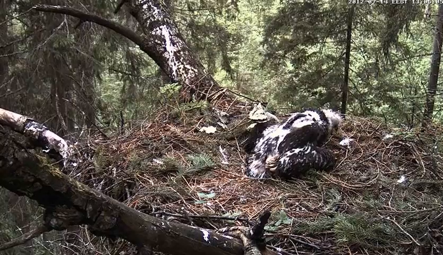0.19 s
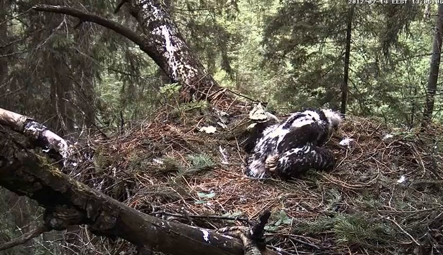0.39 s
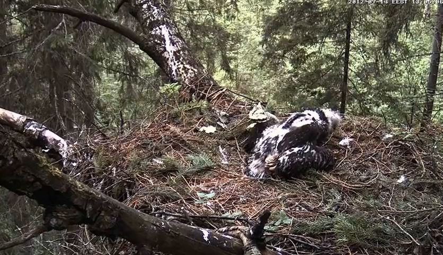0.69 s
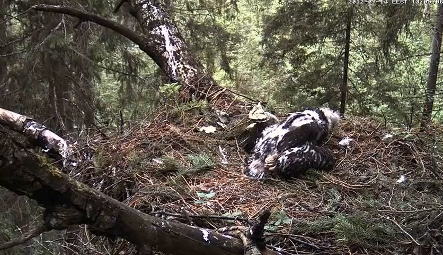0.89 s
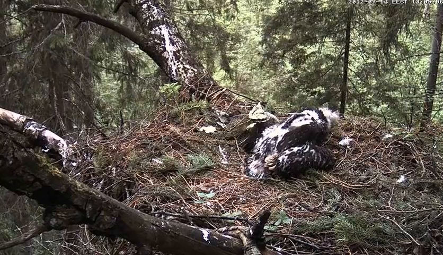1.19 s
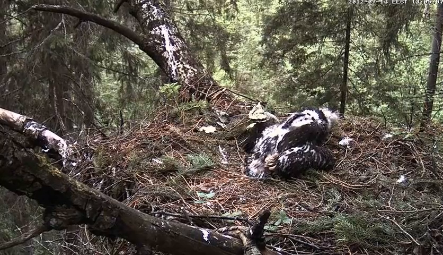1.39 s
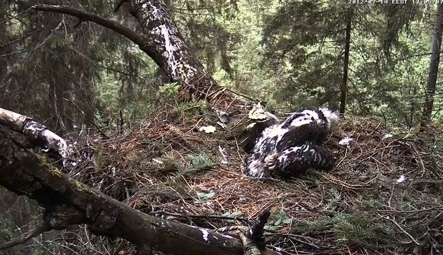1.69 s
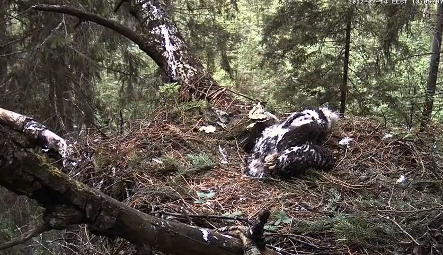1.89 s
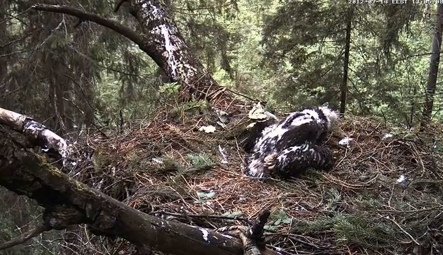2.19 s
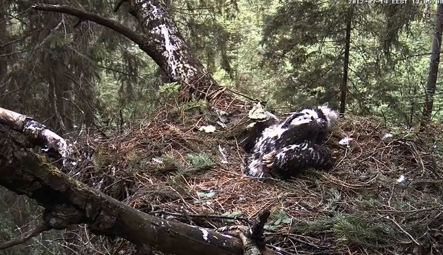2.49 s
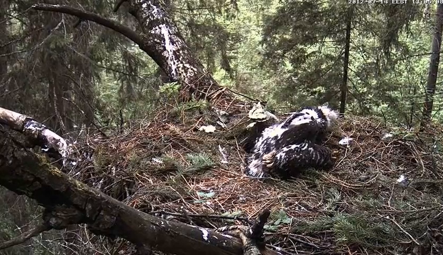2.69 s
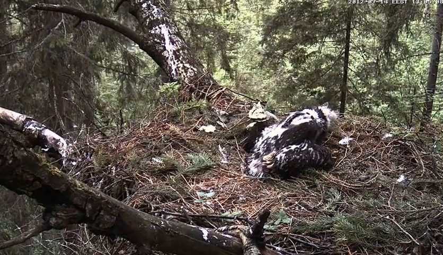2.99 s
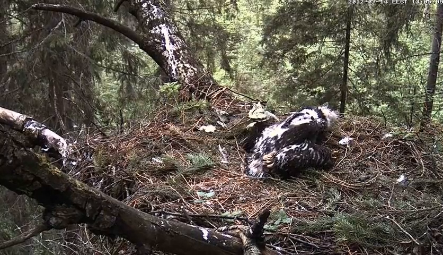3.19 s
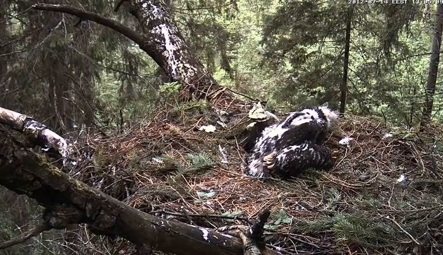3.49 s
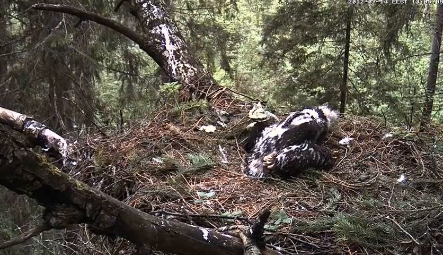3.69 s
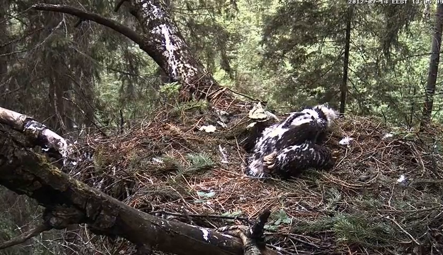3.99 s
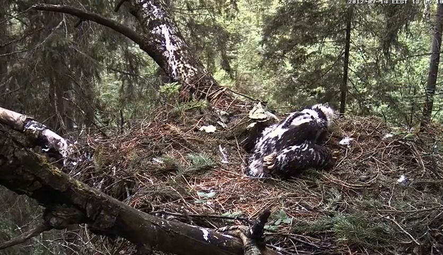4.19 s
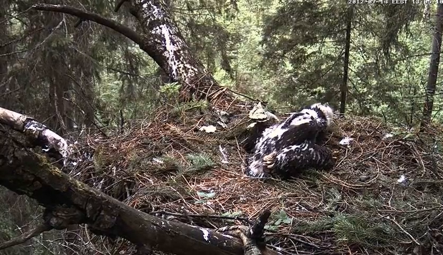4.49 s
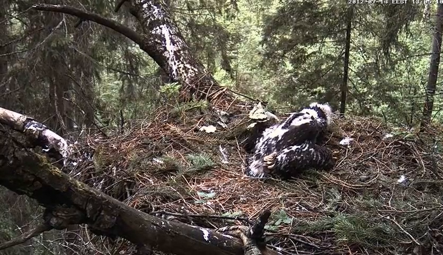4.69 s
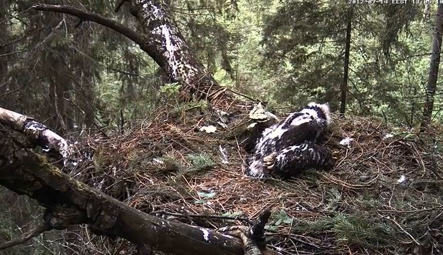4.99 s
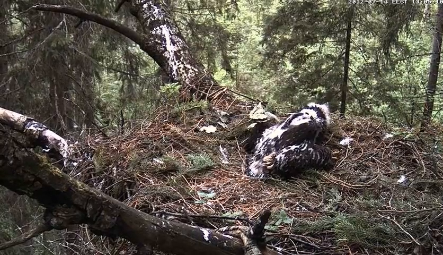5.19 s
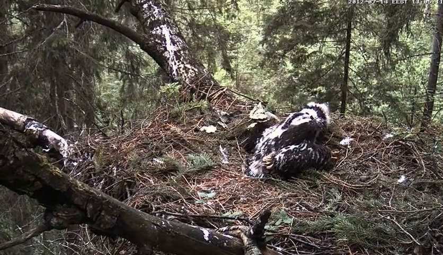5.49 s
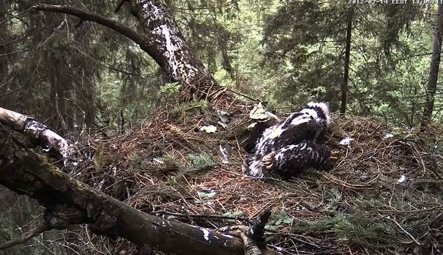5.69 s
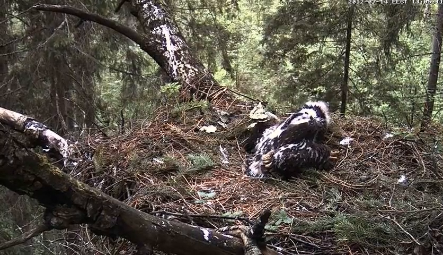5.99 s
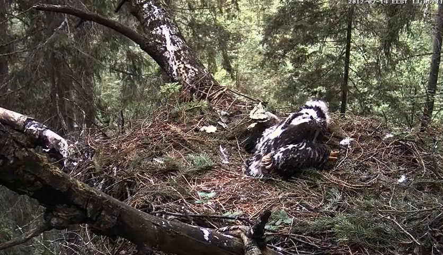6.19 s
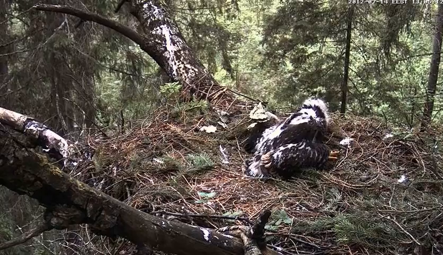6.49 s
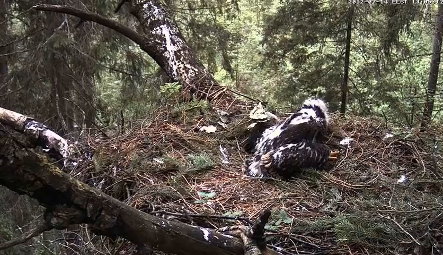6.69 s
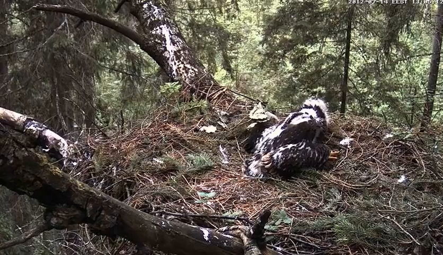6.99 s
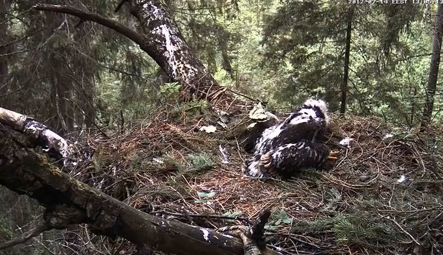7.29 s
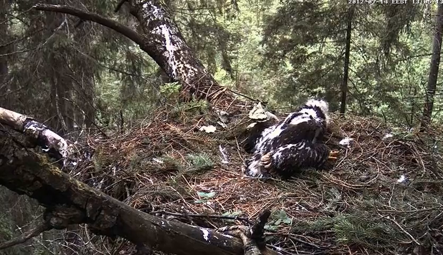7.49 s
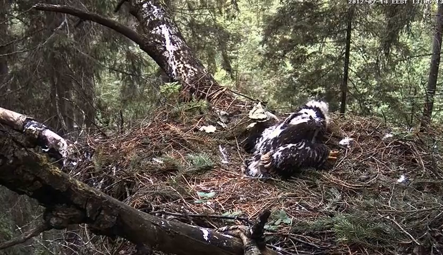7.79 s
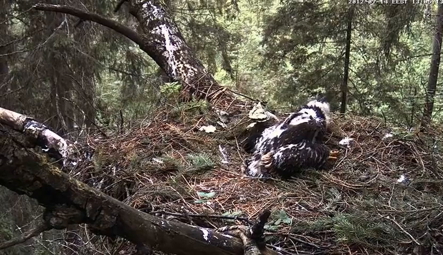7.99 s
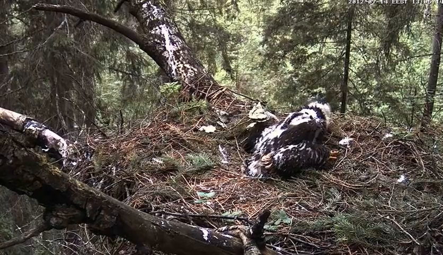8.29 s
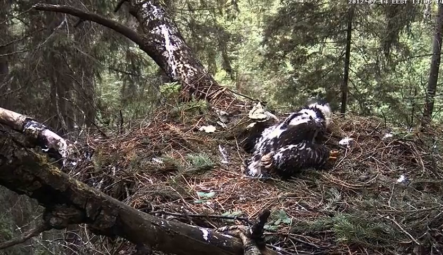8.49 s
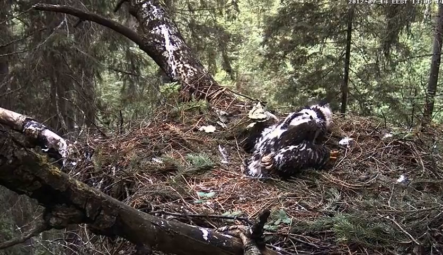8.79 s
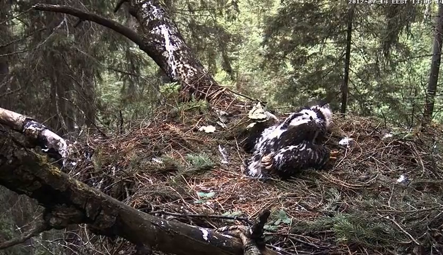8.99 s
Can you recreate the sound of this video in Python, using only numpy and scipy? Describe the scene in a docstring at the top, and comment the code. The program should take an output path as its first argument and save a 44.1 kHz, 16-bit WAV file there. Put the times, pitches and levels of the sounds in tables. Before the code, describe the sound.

An eagle chick calls from its forest nest, giving short, high whistles about three times every two seconds. Each one slides down and breaks to a lower note, some with a raspy edge, and leaves a faint echo. Soft wind hisses steadily in the treetops, with tiny twig scrapes and a few very faint, distant chirps. The close microphone sounds thin and distorts slightly on the calls.

```python
"""Eagle chick begging in a forest

A chick calls on its nest, close to a small microphone that overloads on the calls.
Each call is a falling whistle, made by vibrating membranes in its voice box (the syrinx): it turns
raspy, then breaks down to a lower note, and the trees echo it faintly. Behind it, air rushes
through the treetops, small birds chirp far off and twigs shift in the nest."""
import sys
import numpy as np
from scipy import signal
from scipy.fft import rfft, irfft, next_fast_len
from scipy.io import wavfile
from scipy.ndimage import uniform_filter1d

SR = 44100
rng = np.random.default_rng(int(sys.argv[2]) if len(sys.argv) > 2 else 0)


def wrap_up_sound(samples):
    """Save the sound to the file named by the first command line argument, as 16-bit audio."""
    columns = np.atleast_2d(samples).T
    # keep every value between -1 and 1, then stretch to whole-number steps
    tamed = np.clip(columns, -1, 1)
    steps = np.round(tamed * 32767).astype(np.int16)
    wavfile.write(sys.argv[1], SR, steps)


N = 401310
TIME = np.arange(N) / SR

# The chick's calls: start/s, upper note length/s, lower note length/s, first pitch/Hz,
# pitch at the break/Hz, last pitch/Hz, base level/dB, swell time/s, rasp (0-1), break width/s
CALLS = [(0.459, .058, 0.047, 2744, 2616, 1917, -25, 0.0091, 0.4, 0.0023),
         (1.102, 0.064, 0.05, 2810, 2582, 1964, -23.0, 0.025, 0.51, 0.0029),
         (1.749, 0.062, .050, 3004, 2476, 1959, -22.8, 0.031, 0.77, .002),
         (2.394, 0.064, 0.049, 2680, 2600, 2005, -23.5, 0.014, 0.67, 0.0012),
         (3.129, 0.079, 0.049, 2872, 2587, 1945, -24.5, 0.04, 0.55, .002),
         (3.791, .062, 0.039, 2750, 2555, 1970, -23, .005, 0.64, 0.0019),
         (4.431, 0.066, 0.054, 2752, 2580, 1953, -24.5, 0.016, 0.42, 0.0025),
         (5.092, .059, .065, 3169, 2736, 1972, -27.5, 0.017, 0.15, 0.026),
         (5.798, 0.059, 0.059, 3187, 2690, 1975, -26, .018, 0.2, 0.018),
         (6.477, 0.067, .048, 2805, 2544, 1946, -25.5, 0.014, 0.25, 0.0026),
         (7.128, 0.068, .049, 2910, 2510, 1937, -25, 0.019, 0.3, 0.0029),
         (7.809, .083, 0.039, 2840, 2473, 1862, -26.5, 0.026, 0.2, 0.001),
         (8.446, 0.072, .057, 3026, 2642, 1941, -27.5, 0.03, .21, 0.0023),
         (9.094, 0.07, 0.065, 2800, 2505, 1950, -19, 0.007, 0.15, .002)]


def from_db(db):
    """Turn decibels into a factor to multiply by."""
    return 10 ** (np.asarray(db) / 20)


def unit_power(x):
    """Scale a signal so that its average power is 1."""
    return x / np.sqrt(np.mean(np.abs(x) ** 2) + 1e-20)


def colour(x, spectrum):
    """Make some frequencies louder and others softer, along a curve of f/Hz, gain/dB."""
    hz, db = np.transpose(spectrum)
    size = next_fast_len(N + SR)
    bins_hz = np.maximum(np.fft.rfftfreq(size, 1 / SR), 1)
    gain = from_db(np.interp(np.log(bins_hz), np.log(hz), db))
    return irfft(rfft(x, size) * gain, size)[:N]


def noise(spectrum):
    """Noise of power 1, shaped by a curve of f/Hz, relative level/dB."""
    return unit_power(colour(rng.standard_normal(N), spectrum))


def flutter(rate_hz):
    """A random wobble of typical size 1, up to about the given rate."""
    smoothing = signal.butter(2, rate_hz, fs=SR, output="sos")
    return unit_power(signal.sosfilt(smoothing, rng.standard_normal(N)))


def low_pass(x, edge_hz):
    """Cut away the frequencies above the edge."""
    return signal.sosfilt(signal.ellip(10, 0.1, 90, edge_hz, fs=SR, output="sos"), x)


def bump(centre_s, width_s):
    """A smooth rise and fall in time, 1 at its peak."""
    return np.exp(-np.minimum(((TIME - centre_s) / width_s) ** 2, 100))


def forest_rush(roar_db=-0.45, hiss_db=-3.0, wander_db=0.8, wander_hz=3):
    """Air in the treetops makes a low roar and a lighter hiss, both following the breeze."""
    # Strength of the breeze: t/s, level/dB
    breeze = [(0.0, -48), (1.71, -49), (1.84, -50.5), (2.72, -50.5), (3.02, -50), (6.35, -48.5),
              (6.63, -51.5), (9.05, -50.5)]
    # Tone colours of the roar and the hiss: f/Hz, relative level/dB
    roar = [(100, -68.5), (140, -43.5), (190, -28), (240, -13.5), (320, -4.5), (430, 1), (560, -0.5),
            (700, -6.5), (900, -22), (1400, -32), (2500, -66)]
    hiss = [(120, -66.5), (400, -37), (800, -3), (1250, -2), (1500, 2.5), (1650, -0.5), (1900, 2.5),
            (2400, -5.5), (2750, -5), (3400, -8.5), (3900, -21)]
    breeze_db = np.interp(TIME, *np.transpose(breeze)) + wander_db * flutter(wander_hz)
    return from_db(breeze_db) * (from_db(roar_db) * noise(roar) + from_db(hiss_db) * noise(hiss))


def far_birds(rise_hz_per_s=3340, waver_hz=35):
    """Small birds far off give faint, rising whistles."""
    # One row per chirp: start/s, length/s, first pitch/Hz, level/dB
    chirps = [(0.273, 0.022, 3560, -61), (3.568, 0.063, 3330, -57.5), (4.225, 0.063, 3200, -57),
              (8.896, 0.044, 3480, -65)]
    birds = np.zeros(N)
    waver = waver_hz * flutter(80)
    for start, length, first_hz, db in chirps:
        span = (TIME >= start) & (TIME < start + length)
        t = TIME[span] - start
        pitch = first_hz + rise_hz_per_s * t + waver[span]
        loudness = from_db(db) * np.sin(np.pi * t / length)
        birds[span] += np.sqrt(2) * loudness * np.sin(2 * np.pi * np.cumsum(pitch) / SR)
    return birds


def beak_air(lead_s=0.013, width_s=0.015, onset_db=-53, break_db=-37):
    """Air hisses through the open beak just before each call and as the voice breaks."""
    # Tone colours of the air at those two moments: f/Hz, relative level/dB
    onset_hiss = [(1500, -22), (2200, 4.5), (2800, 10), (3400, -8), (4000, -29.5)]
    break_hiss = [(600, -30.5), (1200, -8.5), (2000, -14), (2400, 1.5), (2900, 6), (3500, -14),
                  (4000, -23.5)]
    before = sum(bump(start - lead_s, width_s) for start, *_ in CALLS)
    breaks = sum(bump(start + upper_s + gap_s / 2, gap_s) for start, upper_s, *_, gap_s in CALLS)
    return from_db(onset_db) * before * noise(onset_hiss) + from_db(break_db) * breaks * noise(break_hiss)


def opening_squeak(arrival_hz=3250, fall_hz_per_s=14000, waver_hz=170, db=-48, lead_s=0.026, fade_s=0.0042):
    """A thin, unsteady squeak swells and slides down into each call."""
    starts = np.array([start for start, *_ in CALLS])
    nearest_call = np.abs(TIME[:, None] - starts).argmin(axis=1)
    time_left = starts[nearest_call] - TIME
    pitch = arrival_hz + fall_hz_per_s * time_left + waver_hz * flutter(600)
    loudness = from_db(db) * np.interp(time_left, [-fade_s, 0, lead_s], [0, 1, 0])
    return np.sqrt(2) * loudness * np.sin(2 * np.pi * np.cumsum(pitch) / SR)


def voice_box():
    """Pitch, loudness and rasp of the calls: a roughening upper note, a sudden break, a lower note."""
    scoop_hz, scoop_s, fall_hz_per_s = 339, 0.0055, 6800
    attack_s, release_s, start_share = 0.0059, 0.014, 0.37
    rough_below_hz, roughen_s, late_rasp, break_rasp = 2816, 0.012, 0.075, 0.22
    upper_boost_db, rasp_loss_db, thin_loss_db = 5, 14.5, 2
    squeeze_s, break_depth = 0.002, 0.76
    shake_db, shake_hz = 1.5, 70
    pitch, loudness, rasp = np.zeros((3, N))
    for start, upper_s, lower_s, first_hz, break_hz, last_hz, db, swell_s, full_rasp, gap_s in CALLS:
        length = upper_s + lower_s
        span = (TIME >= start) & (TIME < start + length)
        t = TIME[span] - start
        time_left = length - t
        upper = t < upper_s
        upper_pitch = first_hz + (break_hz - first_hz) * t / upper_s
        lower_pitch = last_hz + fall_hz_per_s * time_left
        scoop = scoop_hz * np.exp(-t / scoop_s)  # a quick slide in from above
        pitch[span] = np.where(upper, upper_pitch, lower_pitch) + scoop
        # high up the voice is thin and clean; as it sinks it turns louder and rough
        thin = 0.5 + 0.5 * np.tanh((pitch[span] - rough_below_hz) / 15)
        effort = np.minimum(t / swell_s, 1) ** 4.1
        fades = np.minimum(t / attack_s, 1) * np.minimum(time_left / release_s, 1)
        envelope = fades * (start_share + (1 - start_share) * effort)
        # the membranes nearly stop while they switch to the lower note
        stall = np.exp(-((t - upper_s) / np.where(upper, squeeze_s, gap_s)) ** 4)
        note_db = db + upper * (upper_boost_db - rasp_loss_db * full_rasp) - thin_loss_db * thin
        loudness[span] = from_db(note_db) * envelope * (1 - break_depth * stall)
        roughening = full_rasp * (1 - thin) * effort * np.minimum(t / roughen_s, 1)
        settling = late_rasp * time_left / lower_s + break_rasp * stall
        rasp[span] = np.where(upper, roughening, settling)
    shake = from_db(shake_db * rasp * flutter(shake_hz))
    return pitch, loudness * shake, rasp


def chick(voice_db=-0.02, jitter=0.0056, jitter_hz=400, beat_hz=400, beat_spread_hz=100,
          lower_share=0.6, rasp_db=-10.0, air_db=-31):
    """A nearly pure whistle; when it rasps, a lower tone joins in and beats against it."""
    # Tone colour of the rushing breath: f/Hz, relative level/dB
    breath_colour = [(400, -35), (800, -25), (1100, -5), (1700, -3), (2300, 3), (2900, 5), (3600, -14.5),
                     (4000, -28)]
    # the membranes need about two milliseconds to follow any change
    pitch, loudness, rasp = uniform_filter1d(np.array(voice_box()), size=90, axis=1)
    phase = 2 * np.pi * np.cumsum(pitch * (1 + jitter * flutter(jitter_hz))) / SR
    beat_phase = 2 * np.pi * np.cumsum(beat_hz + beat_spread_hz * flutter(150)) / SR
    lower_gain = lower_share * rasp
    tone = np.sqrt(2) * (np.sin(phase) + lower_gain * np.sin(phase - beat_phase))
    breath = (from_db(air_db) + from_db(rasp_db) * rasp) * noise(breath_colour)
    return from_db(voice_db) * loudness * (tone + breath) / np.sqrt(1 + lower_gain ** 2)


def forest_echo(calls, tail_db=-17, fade_s=0.48):
    """Trunks throw the calls back, and leaves scatter them into a faint, fading tail."""
    # Echoes from single trunks: delay/s, gain/dB
    trunks = [(0.011, -23), (0.035, -31), (.092, -40.5)]
    # Tone colour of the whole echo: f/Hz, gain/dB
    echo_colour = [(1500, -10.5), (2100, -3), (2400, -4), (2700, 0.5), (3000, -6), (3600, 8)]
    tail = rng.standard_normal(SR) * from_db(-60 * TIME[:SR] / fade_s)
    response = from_db(tail_db) * unit_power(tail) / np.sqrt(SR)
    for delay_s, db in trunks:
        response[int(delay_s * SR)] += from_db(db)
    return colour(signal.fftconvolve(calls, response)[:N], echo_colour)


def nest_rustles(width_s=0.011, grain_db=3):
    """Dry twigs shift in the nest with short, grainy scrapes."""
    # One row per scrape: t/s, level/dB
    rustles = [(0.861, -45), (1.511, -46), (2.892, -48.5), (3.518, -54), (4.185, -50.5), (5.553, -49),
               (6.219, -52), (6.885, -49), (8.834, -51.5)]
    loudness = sum(from_db(db) * bump(centre_s, width_s) for centre_s, db in rustles)
    scrape = noise([(600, -34), (1300, 12.5), (1900, 18), (2600, 6), (4500, -39)])
    return loudness * unit_power(scrape * from_db(grain_db * flutter(250)))


def scene():
    """The chick and its echoes over the sounds of the forest, in one channel."""
    calls = chick() + opening_squeak() + beak_air()
    return (calls + forest_echo(calls) + nest_rustles() + far_birds() + forest_rush())[None]


def record(dry, converter_hz=8000, overload_level=0.15, overtone_db=18.0, cutoff_hz=12900):
    """A telephone-like sound: a slow digital converter leaks high tones, and overload adds overtones."""
    # Leak of the converter's mirror image (the sound flipped and shifted up in pitch): f/Hz, gain/dB
    mirror_colour = [(3500, -44.5), (4000, -15), (4300, -6), (4600, -17.5), (4800, -32), (5000, -37),
                     (5400, -58.5), (7500, -79.5), (10000, -62.5), (11000, -59), (12000, -28.5)]
    # Tone colour of the overload: f/Hz, relative gain/dB
    overload_colour = [(1000, -43.5), (3500, -26), (4600, -14.5), (5400, -13.5), (5900, -8), (6500, -3),
                       (7400, -0.5), (8000, 0), (8600, -3.5), (9200, -1), (9800, -18), (10500, -2.5),
                       (11700, -3), (12700, -0.5)]
    heard = low_pass(dry[0], converter_hz / 2)
    mirror = colour(2 * heard * np.cos(2 * np.pi * converter_hz * TIME), mirror_colour)
    squashed = overload_level * np.tanh(heard / overload_level)  # loud peaks are rounded off
    overtones = from_db(overtone_db) * colour(squashed - heard, overload_colour)
    return low_pass(heard + mirror + overtones, cutoff_hz)[None]


dry = scene()
out = record(dry)
wrap_up_sound(out)
```